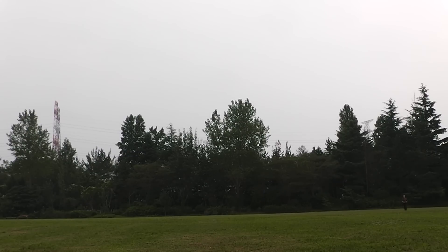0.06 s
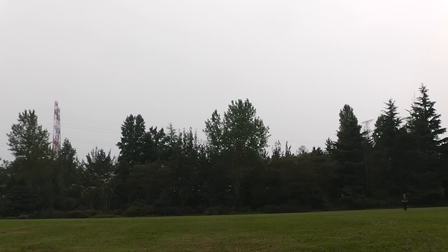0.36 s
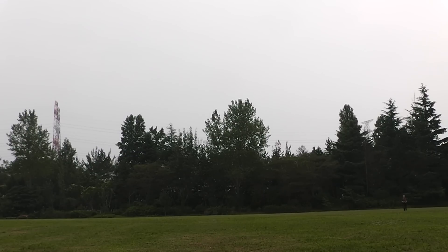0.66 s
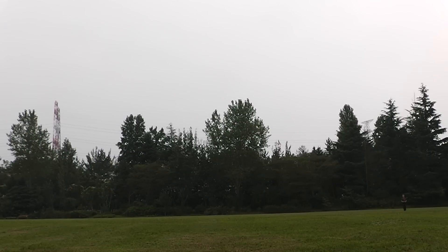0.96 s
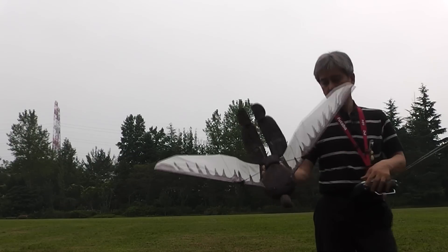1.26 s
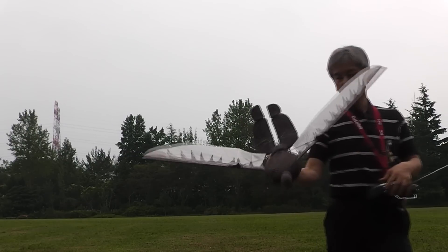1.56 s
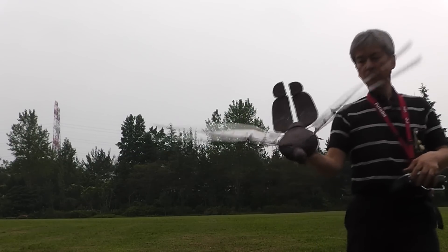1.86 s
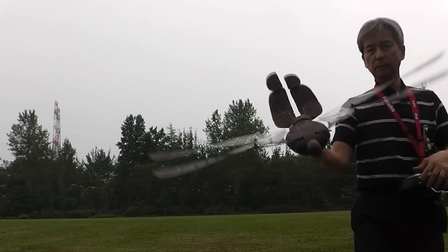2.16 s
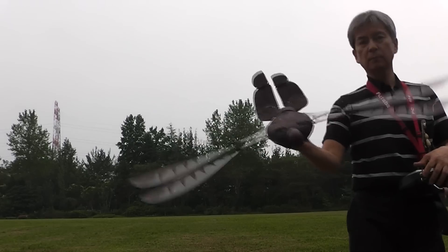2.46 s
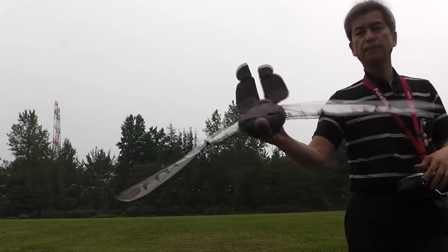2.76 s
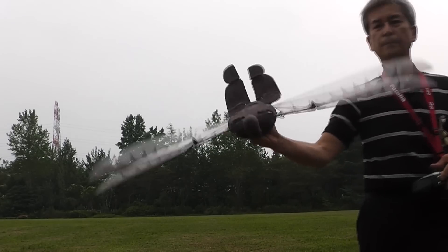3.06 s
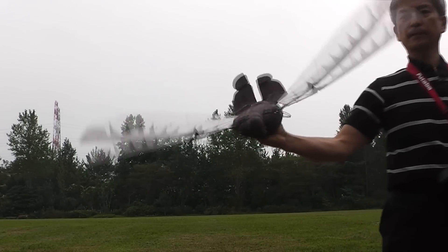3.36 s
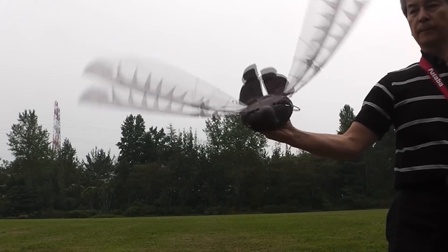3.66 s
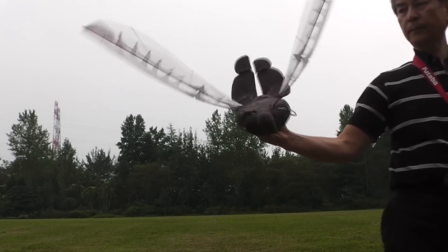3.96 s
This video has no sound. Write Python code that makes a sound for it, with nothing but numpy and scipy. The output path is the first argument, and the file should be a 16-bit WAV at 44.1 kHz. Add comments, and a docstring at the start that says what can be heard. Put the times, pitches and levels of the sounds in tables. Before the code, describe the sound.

A motorised flapping-wing toy starts up close to the microphone, its gears whirring up and down with crackling, knocking wingbeats. Before it come two scuffs, a bird's chip and light rustling, over a field's distant rumble and faint insects.

```python
"""A field, with distant rumble and hissing insects; a motorised flapping-wing toy is held up.
After two scuffs, a bird's chip and a brief dropout, the toy rustles and its motor starts.
The gear tone rises and falls with each wing stroke, the wing film crackles at the turns,
the loose linkage knocks and the speed controller whines thinly."""
import sys
import numpy as np
from scipy import signal
from scipy.fft import rfft, irfft
from scipy.io import wavfile
from scipy.ndimage import uniform_filter1d

SR = 44100
rng = np.random.default_rng(int(sys.argv[2]) if len(sys.argv) > 2 else 0)


def file_out(sig):
    """Save sig as 16-bit WAV at sys.argv[1]."""
    # one column per channel
    cols = np.atleast_2d(sig).T
    # limit, then scale
    lim = np.clip(cols, -1, 1)
    pcm = np.round(lim * 32767).astype(np.int16)
    wavfile.write(sys.argv[1], SR, pcm)


N = 176400
T = np.arange(N) / SR
BIN_HZ = np.arange(N // 2 + 1) * SR / N
MOTOR_ON_S, MEAN_MESH_HZ = 1.828, 1600
DROPOUT_S = (1.148, 1.163)

# Wing strokes: (start [s], start mesh [Hz], peak [s], peak mesh [Hz], rise exponent, rebound [Hz])
STROKES = [ (1.832, 650, 1.948, 2350, .76, 0), (2.003, 900, 2.122, 2220, 1.25, 160),
           (2.173, 920, 2.281, 2350, 1.0, 0), (2.332, 1060, 2.455, 2160, 1.85, 0),
           (2.503, 1080, 2.606, 2290, 1.05, 0), (2.668, 940, 2.788, 2140, 1.4, 110),
           (2.840, 1000, 2.946, 2300, .98, 0), (3.005, 850, 3.126, 2200, 1.25, 120),
           (3.178, 880, 3.286, 2290, .85, 0), (3.337, 880, 3.464, 2170, 1.22, 140),
           (3.514, 870, 3.622, 2290, .98, 0), (3.675, 1020, 3.798, 2160, 1.7, 40),
           (3.845, 1030, 3.956, 2300, 1.0, 0), ]
MESH_MULTIPLES = [.5, 1, 1.5, 2, 3, 4, 5]  # gear partials: (multiple of mesh rate)
PARTIAL_DB = [-6, 0, -9, 1.5, -11, -10, -15]  # gear partials: (relative level [dB])
SQUEALS = [(1, 8, [1.888, 2.095, 2.896, 3.101, 3.224, 3.439, 3.914]),
           (2, 14.5, [1.921, 1.949, 2.122, 2.276, 2.6, 2.928, 2.953, 3.287, 3.462, 3.62, 3.965]),
           (3, 29, [2.213, 3, 3.591])]  # gear squeals: (multiple, lift [dB], times [s])
BODY_MODES = [(1114, 2, 0.031)]  # knocked body: (frequency [Hz], gain [dB], T60 [s])
# Bird notes: (start [s], length [s], from [Hz], to [Hz], glide exponent, level [dB])
BIRD_NOTES = [(1.095, 0.044, 5080, 3840, 2.3, -43.5), (1.12, 0.029, 6970, 4180, 0.84, -45)]
TOY_PAN = [(1500, 0), (8100, -1), (15000, -9)]  # balance: (frequency [Hz], left minus right [dB])
TOY_SCATTER = [(600, -18), (1200, -26), (4400, -16.5), (8000, -25.5), (13000, 3)]  # wing scatter: (frequency [Hz], relative side level [dB])

# Events: (time [s], relative level [dB])
FILM_SNAPS = [(1.948, -37), (1.962, -30), (2.148, -30.5), (2.308, -28), (2.326, -30), (2.464, -32),
              (2.478, -30), (2.6, -32.5), (2.625, -28), (2.651, -29), (2.814, -31.5), (2.956, -32),
              (2.974, -29.5), (2.989, -29), (3.149, -30), (3.288, -31), (3.324, -28.5), (3.485, -33),
              (3.591, -31), (3.649, -25.5), (3.666, -29), (3.824, -30.5), (3.973, -26.5)]
LINKAGE_KNOCKS = [(2.125, -23.5), (2.452, -23.5), (2.641, -23.5), (2.774, -25), (3.103, -25.5),
                  (3.311, -24), (3.465, -21), (3.987, -20.5)]
RUSTLE_ENVELOPE = [(1.16, -53), (1.45, -52), (1.65, -45.5), (1.8, -50), (1.95, -40.5)]
CREASE_TICKS = [(1.648, -50)]
GEAR_CREAKS = [(1.5, -57), (1.642, -54)]
SCUFFS = [(.388, -42), (.618, -54.5)]

# Spectra: (frequency [Hz], relative level [dB])
BODY_RESPONSE = [(800, -20), (1350, -12), (1670, 2), (2100, -7), (3000, -13), (4400, -10), (7000, -20),
                 (9400, -10), (12000, -20)]
CLATTER_SPECTRUM = [(300, -2.5), (520, -1.5), (740, 7), (920, 1), (1120, 8.5), (1350, -1.5), (1680, 4.5),
                    (2100, -8.5), (2700, 2.5), (3400, -3), (4400, 4.5), (5300, -5.5), (7400, -8.5),
                    (9400, -6.5), (11500, -5), (14500, -29)]
SNAP_SPECTRUM = [(400, -35), (1100, -3.5), (6500, -4.5), (9500, 0.5), (12500, -5), (15500, -19)]
CRINKLE_SPECTRUM = [(6000, -17), (9600, 0.5), (14500, -22.5)]
AIR_SPECTRUM = [(40, -20), (95, 1), (290, -11.5), (600, -18.5)]
KNOCK_SPECTRUM = [(150, -15.5), (720, -4.5), (900, -8), (1100, 5), (1350, -7), (6000, -50)]
RUSTLE_SPECTRUM = [(1700, 13), (2400, -5), (6500, -9), (9800, 2), (12000, -11)]
SCUFF_SPECTRUM = [(1000, 15), (2200, -2), (3300, -9), (4600, -0.5), (6000, -4), (10000, 1), (15000, -13)]
RUMBLE_SPECTRUM = [(20, -4), (36, -1), (130, -2.5), (310, -7), (450, -18), (740, -20), (1000, -25),
                   (1200, -20), (1800, -31), (2200, -41), (3300, -62.5)]
INSECT_SPECTRUM = [(2500, -21), (3400, -25), (4400, -13.5), (5500, -22), (6150, -18), (6600, -6),
                   (7300, -6.5), (7900, 0.5), (8700, -6.5), (9600, -12), (11500, -23)]


def mesh_rate_hz(last_turn_s=4.012, last_hz=1000, rebound_delay_s=.044, rebound_s=.016, inertia_s=.007):
    """Gears speed up each stroke, checked in some by wing rebound, then brake into the turn."""
    hz = np.full(N, float(STROKES[0][1]))
    turns = [row[:2] for row in STROKES[1:]] + [(last_turn_s, last_hz)]
    for (start_s, low_hz, peak_s, peak_hz, bend, rebound_hz), (end_s, end_hz) in zip(STROKES, turns):
        rise = np.clip((T - start_s) / (peak_s - start_s), 0, 1) ** bend
        fall = np.cos(np.pi / 2 * np.clip((T - peak_s) / (end_s - peak_s), 0, 1)) ** 2.7
        rising_hz = low_hz + (peak_hz - low_hz) * rise
        falling_hz = end_hz + (peak_hz - end_hz) * fall
        u = np.clip((T - start_s - rebound_delay_s) / rebound_s, -10, 10)
        stroke_hz = np.where(T < peak_s, rising_hz, falling_hz) - rebound_hz * u * np.exp((1 - u * u) / 2)
        hz = np.where(T >= start_s, stroke_hz, hz)
    return uniform_filter1d(hz, int(inertia_s * SR))


def gears(mesh_hz, running, roughness=.5, rough_hz=170, squeal_s=.014, frame_t60_s=.03):
    """Meshing teeth rasp and squeal through the hollow body; loose teeth clatter louder with speed."""
    phase = 2 * np.pi * np.cumsum(mesh_hz * (1 + .02 * drift(200) + .012 * drift(30))) / SR
    speed = mesh_hz / MEAN_MESH_HZ
    force = 0
    for multiple, db in zip(MESH_MULTIPLES, PARTIAL_DB):
        partial = np.sin(multiple * phase)
        rasp = (1 + roughness * drift(rough_hz)) * partial
        rasp += roughness * drift(rough_hz) * np.cos(multiple * phase)
        squeal = sum((from_db(lift_db) - 1) * np.exp(-2 * multiple * ((T - s) / squeal_s) ** 2)
                     for k, lift_db, times_s in SQUEALS if k == multiple for s in times_s)
        flutter = from_db(2.2 * drift(45))
        force += from_db(db) * (flutter * rasp + squeal * partial)
    tone = coloured(force * running * speed ** .18, BODY_RESPONSE) * np.sqrt(running.mean())
    tone += from_db(-9) * ringing(tone, frame_t60_s)
    clatter = grains(7000 * (1 + .6 * np.cos(phase)), spread_db=0) * speed * from_db(2 * drift(78))
    clatter += from_db(-11) * ringing(clatter, frame_t60_s)
    return from_db(-31) * tone + from_db(-38) * running * coloured(clatter, CLATTER_SPECTRUM)


def wings(mesh_hz, running):
    """Wings push air; their film crinkles with stroke speed and crackles as it snaps taut."""
    air = running * noise(AIR_SPECTRUM)
    snaps = coloured(grains(5000, spread_db=-1.5), SNAP_SPECTRUM)
    snaps *= bursts(FILM_SNAPS, rise_s=.0094, fall_s=.0067)
    crinkle = coloured(grains(2500, spread_db=4.5), CRINKLE_SPECTRUM)
    crinkle *= running * (mesh_hz / MEAN_MESH_HZ) ** 2.44
    return from_db(-38) * air + from_db(1.5) * snaps + from_db(-44.5) * crinkle


def linkage(running, contact_s=.002):
    """The loose linkage clacks; hard knocks take up its play and ring the plastic body."""
    rings = 0
    for time_s, db in LINKAGE_KNOCKS:
        age_s = np.clip(T - time_s, 0, .5)
        ring = sum(from_db(mode_db + rng.normal() - 60 * age_s / t60_s) * np.sin(2 * np.pi * hz * age_s)
                   for hz, mode_db, t60_s in BODY_MODES)
        rings += from_db(db) * ring * (1 - np.exp(-age_s / contact_s))
    rattle = coloured(grains(900, spread_db=4), KNOCK_SPECTRUM)
    rattle *= bursts(LINKAGE_KNOCKS, rise_s=.00042, fall_s=.0088)
    clacks = running * coloured(grains(170, spread_db=4), KNOCK_SPECTRUM)
    return from_db(5) * rings + from_db(-5) * rattle + from_db(-41) * clacks


def controller(mesh_hz, switching_hz=7772, sag=.0072, attack_s=.0053, full_brake_hz_per_s=22000):
    """Switching whine: pitch sags with motor speed, level dips as the wings brake the motor."""
    hz = switching_hz * (1 - sag * (mesh_hz / MEAN_MESH_HZ - 1))
    on = np.clip((T - MOTOR_ON_S) / attack_s, 0, 1)
    braking = np.clip(-np.gradient(mesh_hz) * SR / full_brake_hz_per_s, 0, 1)
    return on * from_db(-46.5 - 6 * braking + 3 * drift(5.5)) * sine(hz)


def handling(creak_hz=2970):
    """Gears creak and film ticks as the toy is raised; the film's rustle builds, then holds."""
    creaks = bursts(GEAR_CREAKS, rise_s=.016, fall_s=.016) * sine(creak_hz * (1 + .014 * drift(310)))
    envelope = from_db(np.interp(T, *np.transpose(RUSTLE_ENVELOPE))) * (T > DROPOUT_S[1])
    rustle = envelope * coloured(grains(6000, spread_db=3), RUSTLE_SPECTRUM)
    tick = bursts(CREASE_TICKS, rise_s=.00435, fall_s=.0087) * noise(CRINKLE_SPECTRUM)
    return rustle + tick + creaks


def wing_scatter(toy):
    """The toy sits slightly right; its wings scatter treble differently to each side."""
    spectrum = rfft(toy)
    side = ringing(irfft(spectrum * from_db(at_hz(TOY_SCATTER, BIN_HZ)), N), t60_s=.031)
    pan_db = at_hz(TOY_PAN, BIN_HZ) / 2
    direct = irfft(spectrum * from_db([pan_db, -pan_db]), N)
    return stereo(direct, side, width=.57)


def scuffs():
    """Two dry scuffs close by, the first with a dull bump."""
    friction = coloured(grains(7000, spread_db=3), SCUFF_SPECTRUM)
    bump = noise(KNOCK_SPECTRUM) * bursts([(.379, -30.5)], rise_s=.0032, fall_s=.01)
    return friction * bursts(SCUFFS, rise_s=.0094, fall_s=.049) + bump


def bird(jitter=.049, octave_db=-17):
    """One harsh chip of two overlapping, falling notes."""
    chip = 0
    for start_s, length_s, from_hz, to_hz, bend, db in BIRD_NOTES:
        progress = np.clip((T - start_s) / length_s, 0, 1)
        hz = from_hz + (to_hz - from_hz) * progress ** bend
        phase = 2 * np.pi * np.cumsum(hz * (1 + jitter * drift(526))) / SR
        envelope = np.minimum(progress * 10, 1) * np.sqrt(2 * (1 - progress))
        tone = np.sin(phase) + from_db(octave_db) * np.sin(2 * phase)
        chip += from_db(db + 2 * drift(150)) * envelope * tone
    return chip


def insects():
    """A wide, hissing chorus in grass and trees."""
    chorus = stereo(noise(INSECT_SPECTRUM), noise(INSECT_SPECTRUM), width=.58)
    return chorus * from_db(-54 + .73 * drift(40)) * from_db([[.25], [-.25]])


def rumble():
    """Distant traffic and air."""
    return from_db(-31.5) * stereo(noise(RUMBLE_SPECTRUM), noise(RUMBLE_SPECTRUM), width=.076)


def from_db(db):
    """Decibels to gain."""
    return 10 ** (np.asarray(db) / 20)


def unit_rms(x):
    """Scale to rms 1."""
    return x / np.sqrt(np.mean(x ** 2) + 1e-20)


def sine(hz):
    """Gliding sine, rms 1."""
    return np.sqrt(2) * np.sin(2 * np.pi * np.cumsum(hz) / SR)


def at_hz(table, hz):
    """Interpolate over log frequency."""
    table_hz, values = np.transpose(table)
    return np.interp(np.log(np.maximum(hz, 1)), np.log(table_hz), values)


def coloured(x, spectrum):
    """Minimum-phase filter, falling 20 dB/octave past the table's ends; output rms 1."""
    hz = np.maximum(BIN_HZ, 1)
    beyond_octaves = np.abs(np.log2(hz / np.clip(hz, spectrum[0][0], spectrum[-1][0])))
    gain_db = at_hz(spectrum, hz) - 20 * np.minimum(beyond_octaves, 4)
    cepstrum = irfft(np.log(from_db(gain_db)), N)
    cepstrum[1:N // 2] *= 2
    cepstrum[N // 2 + 1:] = 0
    return unit_rms(irfft(rfft(x) * np.exp(rfft(cepstrum)), N))


def noise(spectrum):
    """Coloured noise, rms 1."""
    return coloured(rng.standard_normal(N), spectrum)


def drift(rate_hz):
    """Low-passed random wander, rms 1."""
    return unit_rms(irfft(rfft(rng.standard_normal(N)) / (1 + (BIN_HZ / rate_hz) ** 2), N))


def grains(per_s, spread_db):
    """Clicks of random time, sign and size."""
    sizes = from_db(spread_db * np.minimum(rng.exponential(1, N), 4))
    return sizes * rng.choice([-1, 1], N) * (rng.random(N) < per_s / SR)


def bursts(events, rise_s, fall_s):
    """Power sum of exponential swells and decays."""
    envelopes = (from_db(db) * np.exp(-np.maximum((s - T) / rise_s, (T - s) / fall_s))
                 for s, db in events)
    return np.sqrt(sum(envelope ** 2 for envelope in envelopes))


def ringing(x, t60_s):
    """Short ring of dense modes, unit energy gain."""
    age_s = T[:SR // 8]
    tail = rng.standard_normal(len(age_s)) * from_db(-60 * age_s / t60_s)
    return signal.fftconvolve(x, tail / np.sqrt(np.sum(tail ** 2)))[:N]


def stereo(mid, side, width):
    """Mid/side to left/right."""
    return mid + width * side * np.array([[1], [-1]])


def scene(spin_up_s=.037):
    """The toy in the field."""
    mesh_hz = mesh_rate_hz()
    running = np.clip((T - MOTOR_ON_S) / spin_up_s, 0, 1) ** 2
    toy = gears(mesh_hz, running) + wings(mesh_hz, running) + linkage(running)
    toy += controller(mesh_hz) + handling()
    return wing_scatter(toy) + rumble() + insects() + scuffs() + bird()


def record(dry, cutoff_hz=15900):
    """Brief dropout, then a steep low-pass."""
    gate = uniform_filter1d(1.0 * ((T < DROPOUT_S[0]) | (T > DROPOUT_S[1])), size=20)
    lowpass = signal.ellip(12, .1, 80, cutoff_hz, fs=SR, output="sos")
    return signal.sosfilt(lowpass, dry * gate)


dry = scene()
out = record(dry)
file_out(out)
```